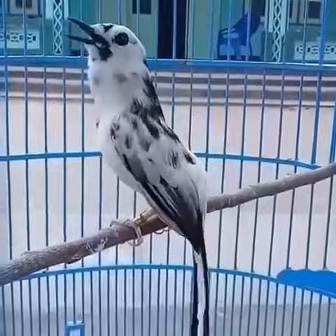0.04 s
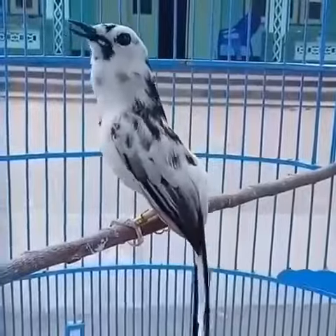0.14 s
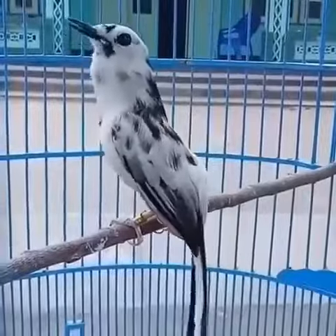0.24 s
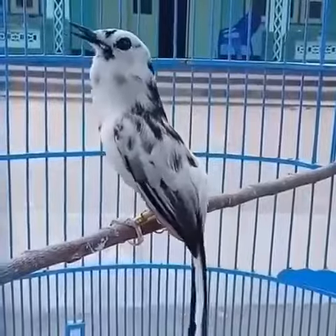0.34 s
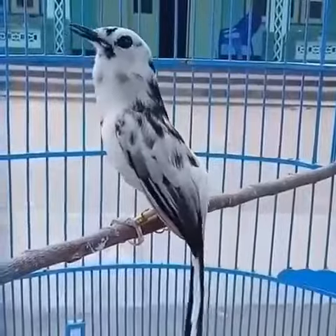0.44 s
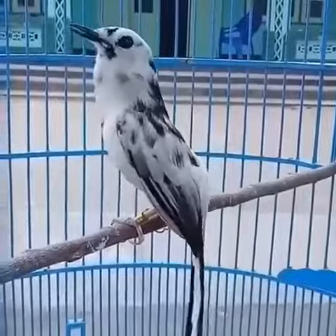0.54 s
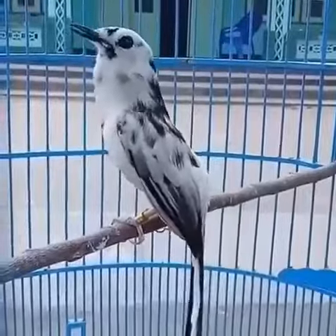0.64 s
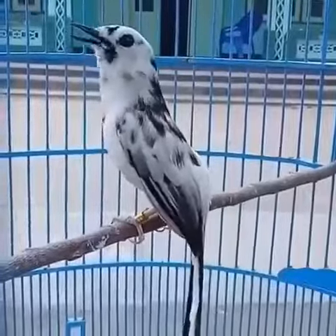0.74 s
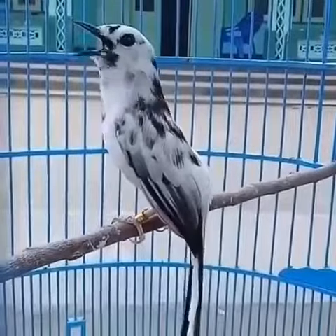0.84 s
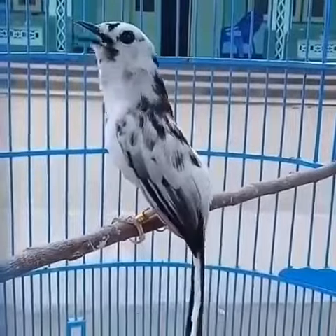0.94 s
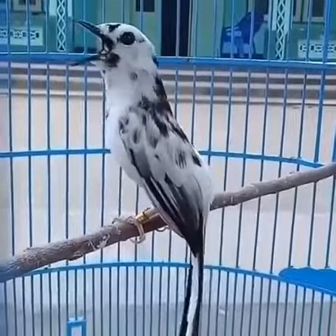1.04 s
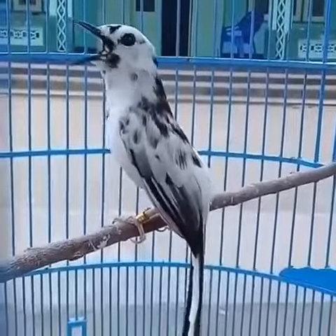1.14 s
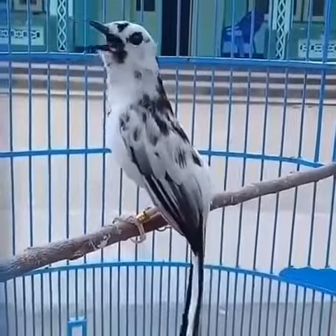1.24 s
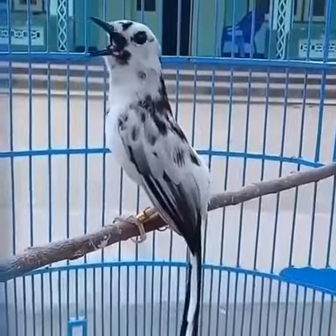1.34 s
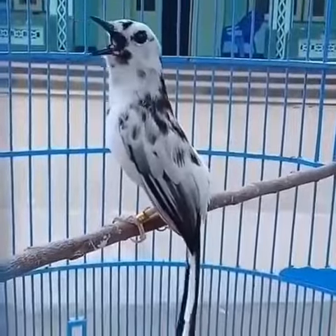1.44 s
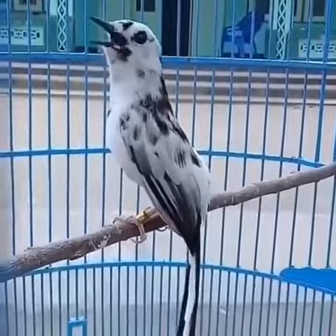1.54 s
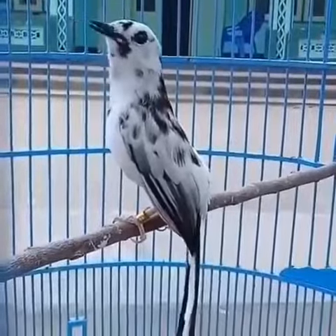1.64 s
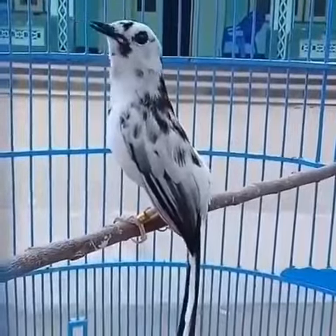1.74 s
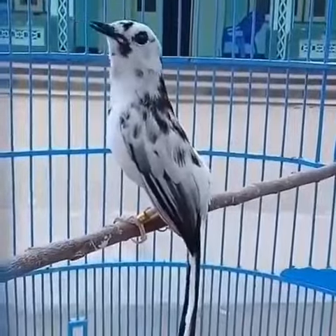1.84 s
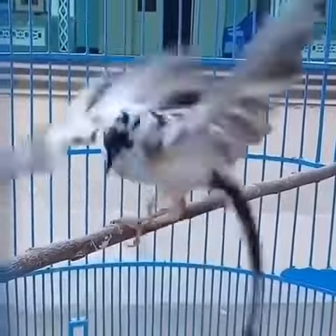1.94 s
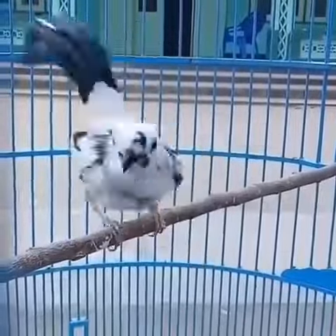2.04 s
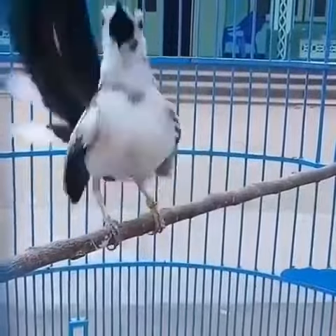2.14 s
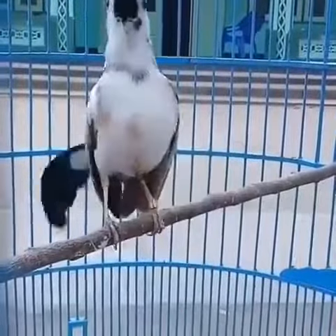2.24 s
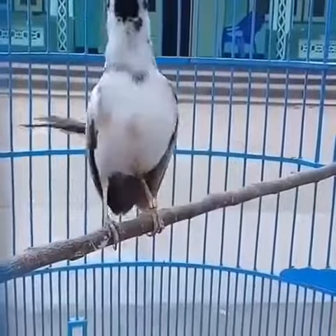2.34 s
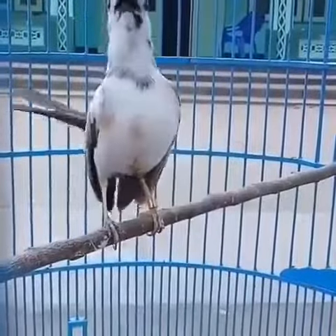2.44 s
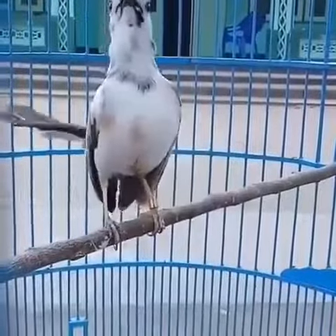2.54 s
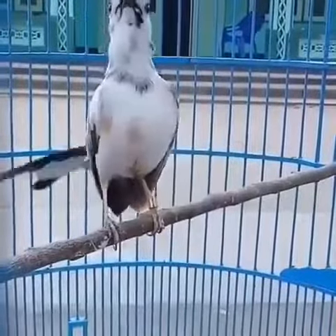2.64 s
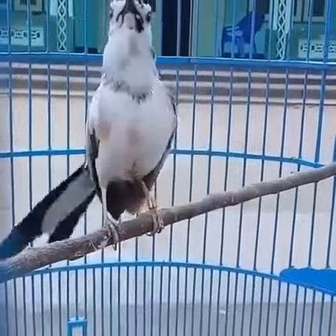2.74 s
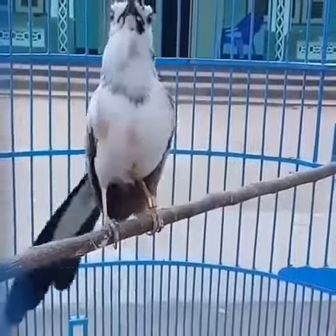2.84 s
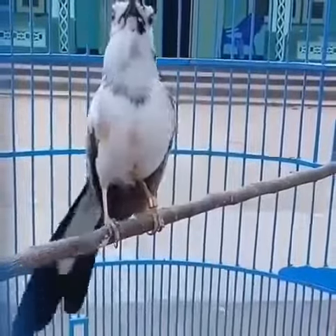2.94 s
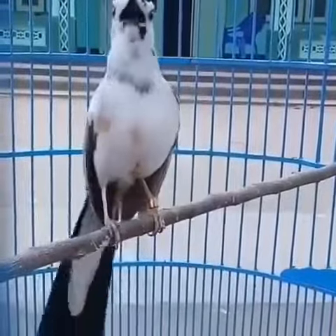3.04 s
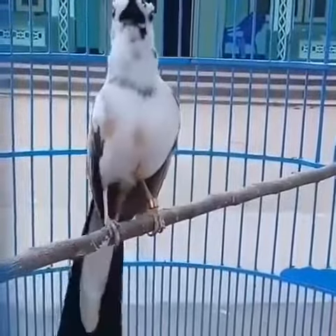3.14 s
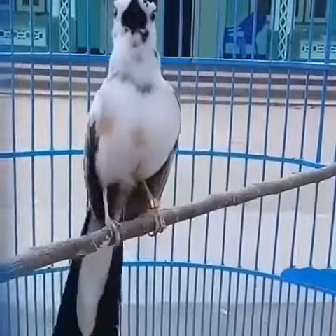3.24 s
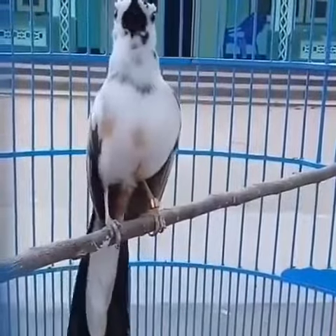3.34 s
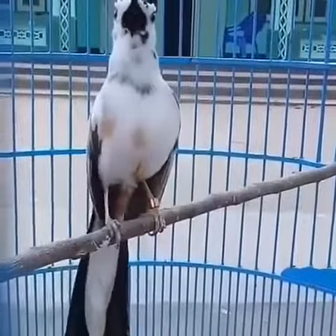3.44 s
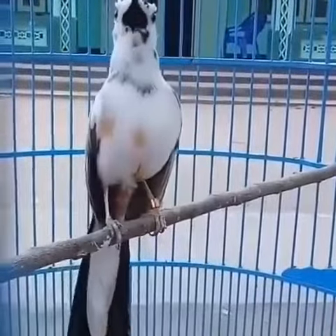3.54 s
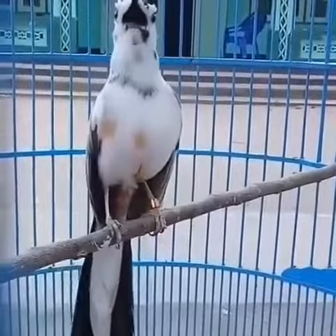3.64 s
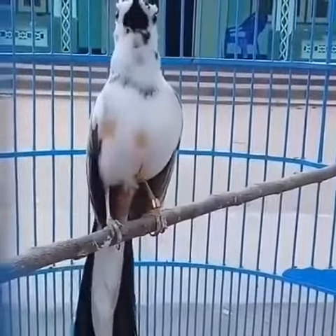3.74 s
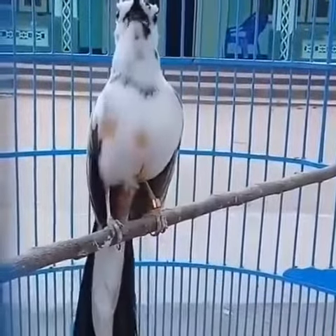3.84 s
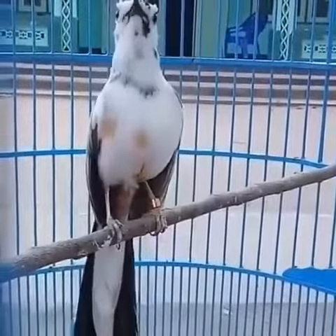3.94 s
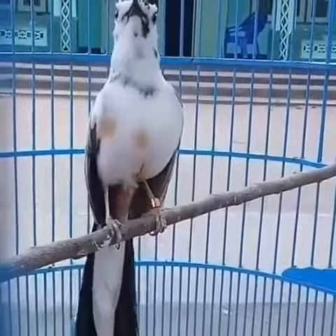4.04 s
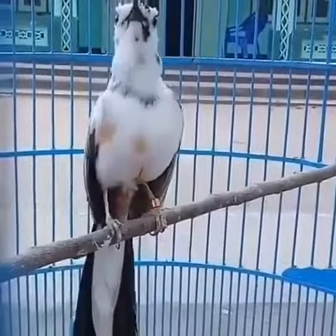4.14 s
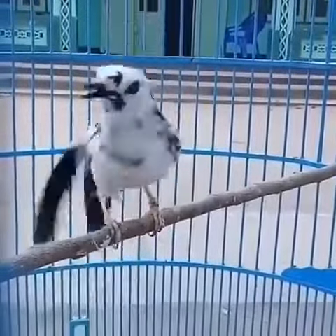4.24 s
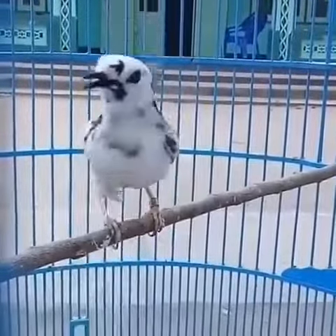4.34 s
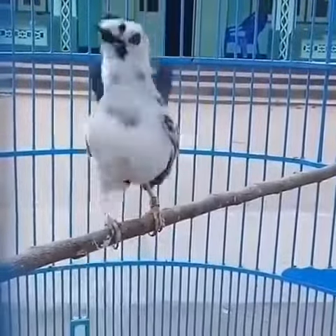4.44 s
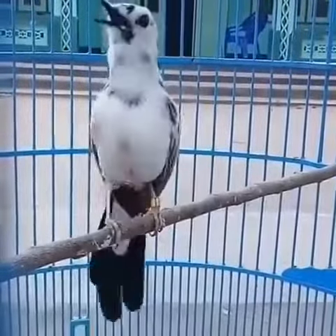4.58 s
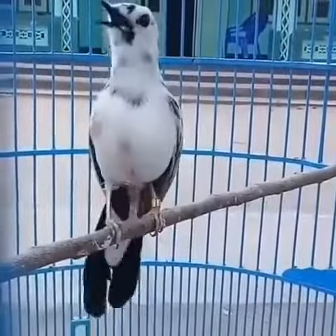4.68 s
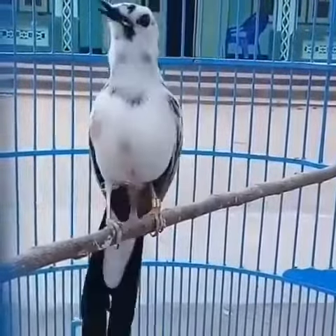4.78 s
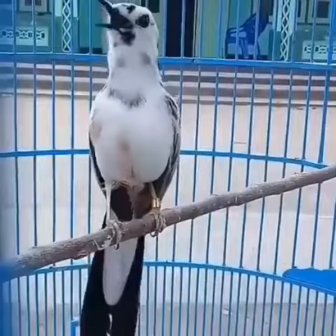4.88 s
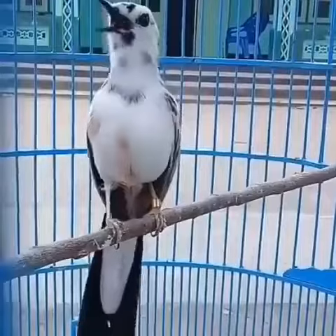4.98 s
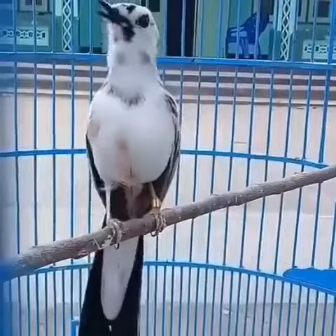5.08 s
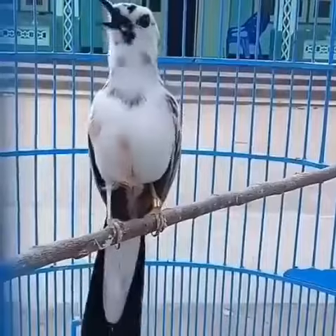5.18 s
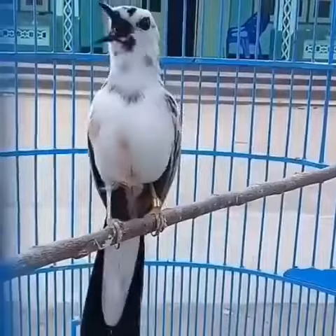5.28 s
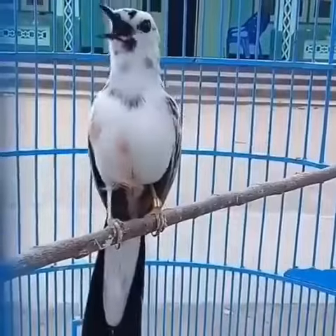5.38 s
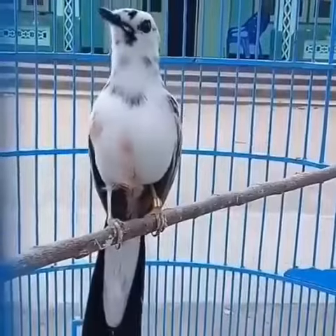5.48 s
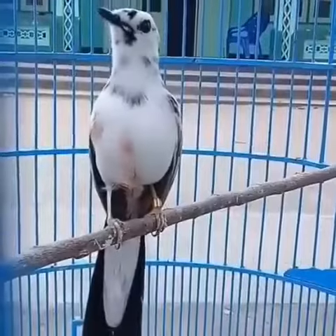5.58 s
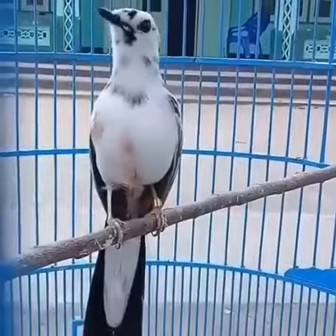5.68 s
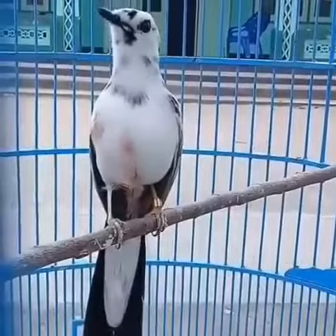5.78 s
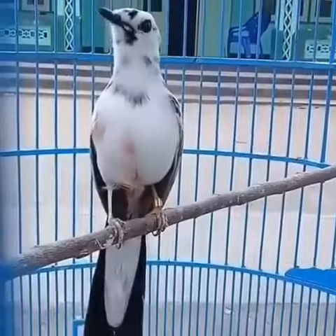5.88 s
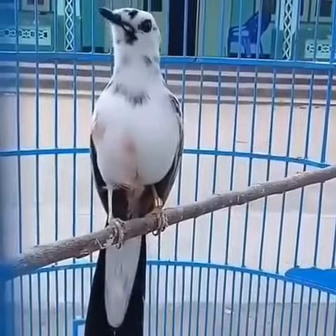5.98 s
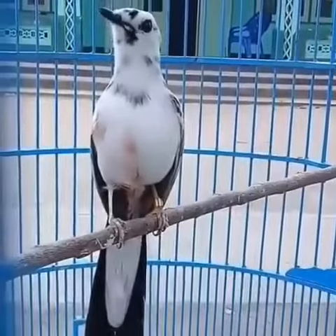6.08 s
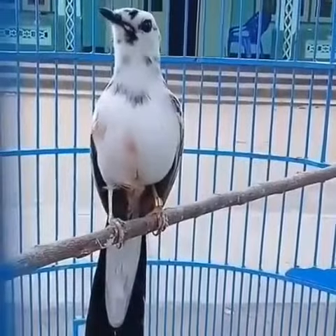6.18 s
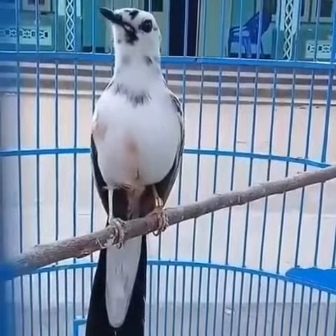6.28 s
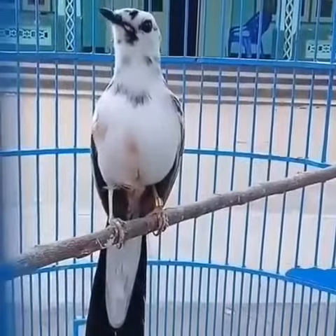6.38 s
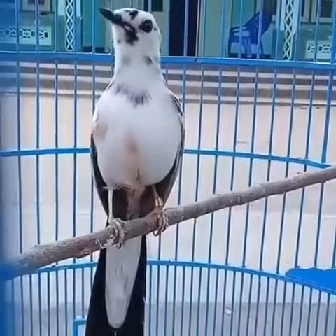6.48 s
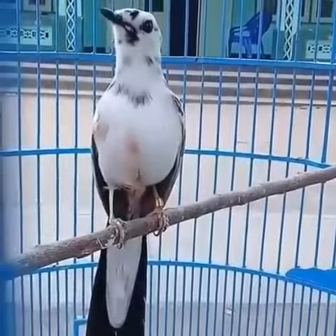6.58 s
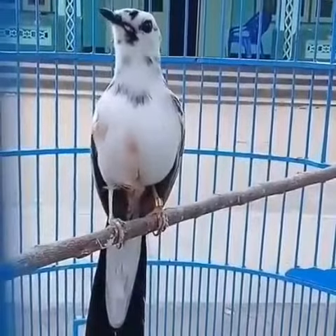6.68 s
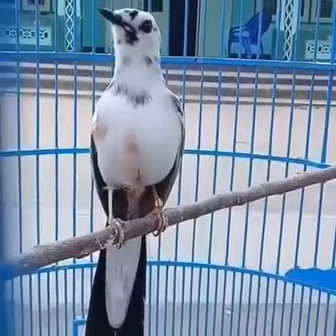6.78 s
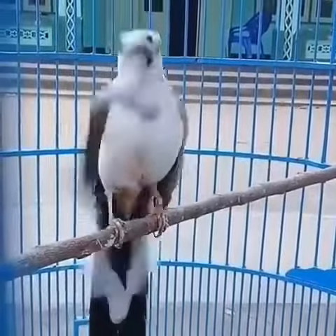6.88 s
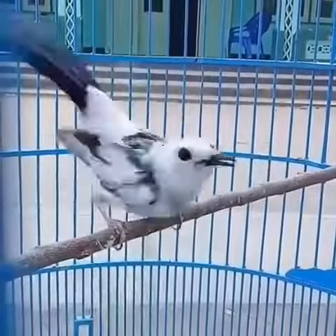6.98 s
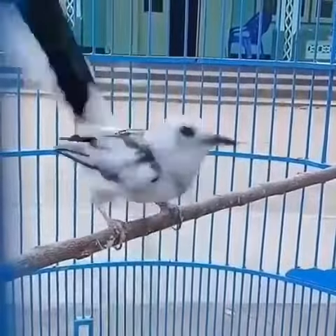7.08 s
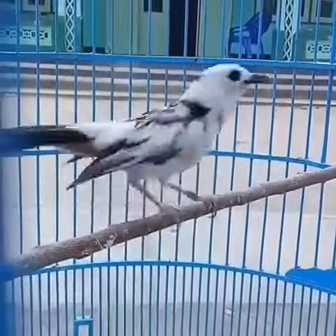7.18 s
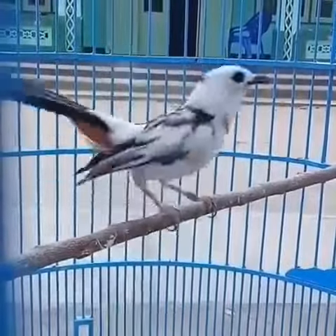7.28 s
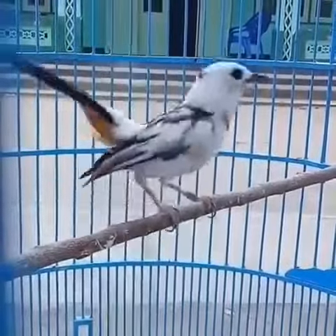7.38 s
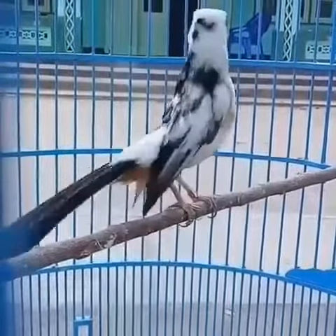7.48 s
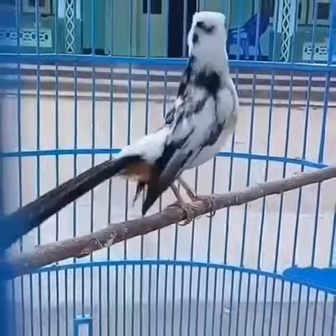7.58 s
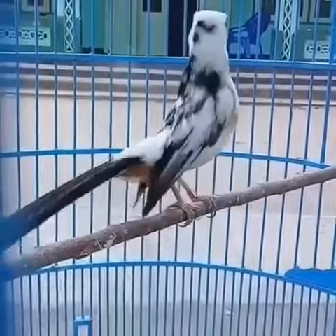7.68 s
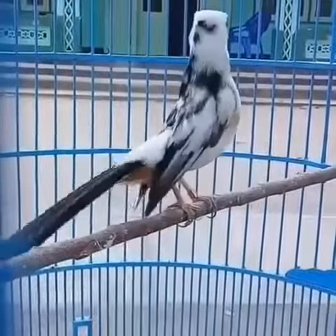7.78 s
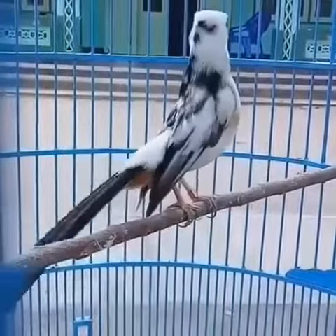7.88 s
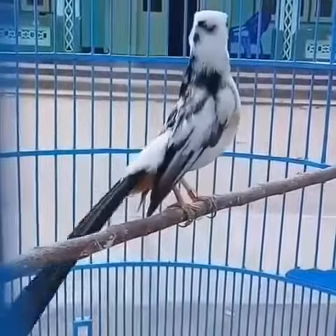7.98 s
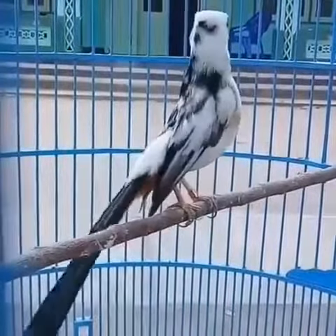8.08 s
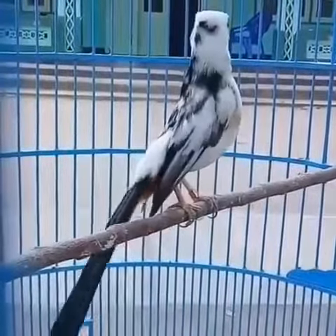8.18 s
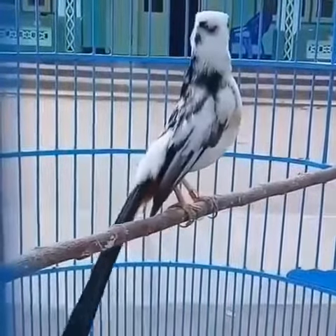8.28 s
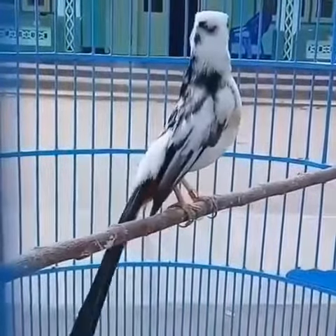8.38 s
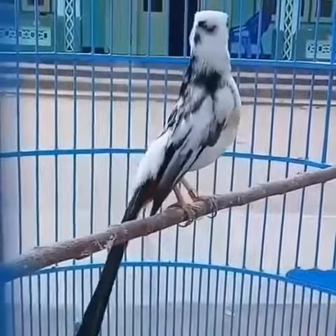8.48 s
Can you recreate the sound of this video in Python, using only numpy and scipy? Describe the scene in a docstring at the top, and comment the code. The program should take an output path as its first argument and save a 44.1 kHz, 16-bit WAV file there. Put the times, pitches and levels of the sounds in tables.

```python
"""Paved yard, close to a phone microphone: a caged songbird whistles, warbles, rasps and croaks low.
Its whistles are near-sine tones with flickering overtones; rasps and croaks are clicks through throat resonances.
Other birds whistle further off and a dove coos, as wavering tones; chatter and feather rustles are filtered clicks.
A faint town rumble of shaped noise lies behind, and a decaying noise tail makes the yard ring after each note."""
import sys
import numpy as np
from scipy import signal
from scipy.fft import rfft, irfft
from scipy.io import wavfile
from scipy.ndimage import uniform_filter1d

SR = 44100
rng = np.random.default_rng(int(sys.argv[2]) if len(sys.argv) > 2 else 0)


def materialize(psi):
    """Save the field psi as 16-bit PCM at rate SR to the path in sys.argv[1].

    A 1-D psi becomes a single channel; in a 2-D psi each row is a channel.
    """
    bounded = np.clip(np.atleast_2d(psi).T, -1, 1)
    quanta = np.round(bounded * 32767).astype(np.int16)
    wavfile.write(sys.argv[1], SR, quanta)


N = 375732
TIME = np.arange(N) / SR

# Distant town, spectrum before overall scaling: pitch_hz, level_db
TOWN = [(15, -42), (28, -13), (110, 0), (390, -17), (1100, -27), (2500, -15), (4500, -29), (13000, -46)]
TOWN_DB = -57
TOWN_SWELL_S, TOWN_SWELL_DB = [0, 2.1, 3.8, 5.7, 8.5], [-3.5, 0.5, -2.0, 0.63, -2.4]

# Distant dove, heard mostly by the upper octave: start_s, upper_octave_hz, level_db
COOS = [(4.052, 953, -51), (4.188, 942, -52.5), (4.559, 930, -47), (5.558, 720, -43), (5.691, 902, -42.5),
        (5.822, 1025, -40.5), (6.133, 917, -44.5), (6.341, 946, -48.5), (6.532, 922, -50.5),
        (6.791, 648, -44), (6.888, 656, -48.5)]
COO_S, COO_LOW_DB = 0.076, -18.5  # length; lower octave against the upper

# Scratchy bird chatter and soft feather rustles, short bursts and one long hiss of filtered clicks:
# start_s, length_s, centre_hz, filter_width_hz, level_db
CHATTER_AND_RUSTLES = [(.75, 0.22, 3800, 500, -41.5), (.48, .2, 4200, 1500, -47),
                       (.001, 0.035, 3500, 1100, -41), (5.825, 0.12, 5300, 2600, -50),
                       (6.192, 0.03, 4500, 1300, -43), (7.2, 0.49, 3040, 3000, -52.5),
                       (6.876, 0.042, 5500, 800, -44.5)]
# Far whistle shapes: length_share, share_of_way_from_first_to_second_pitch, level_db
FADING = [(0, 0.063, -2), (.3, 0.82, 0.5), (1, 0.97, -16.5)]
SWELLING = [(0, 0.017, -16.5), (.5, .5, -6), (1, 1, 1)]
HOOK = [(0, .35, -14.5), (.15, 0.96, -4), (.3, .6, 1), (.45, .12, 1.5), (1, 0.17, -13.5)]
CASCADE = [(0, .4, -15), (.1, 1, -4), (.26, .62, -2), (.38, .45, 0.5), (.52, .04, 0), (1, 0.02, -13.5)]
HUMP = [(0, 0.12, -8), (.55, 1, 1.5), (1, 0.13, -12)]
# When each is heard: start_s, length_s, first_pitch_hz, second_pitch_hz, level_db (added to the shape)
FADINGS = [(0.217, .177, 2630, 2255, -38), (0.515, 0.092, 4090, 3860, -39.5),
           (0.596, 0.083, 3680, 3694, -32), (1.887, 0.28, 2640, 2380, -50.5),
           (2.979, 0.15, 3214, 3125, -50), (6.003, 0.065, 6000, 3696, -32), (6.055, .1, 3910, 2740, -42.5),
           (6.667, 0.161, 1726, 1826, -31), (6.823, 0.4, 3000, 3305, -51.5),
           (8.039, 0.21, 2276, 2290, -47.5), (8.259, 0.28, 2580, 3193, -50.5)]
SWELLINGS = [(0.121, 0.052, 2110, 4600, -41.5), (.45, 0.072, 3700, 2864, -30.5),
             (2.22, 0.12, 3233, 3560, -44.5), (3.17, 0.12, 2542, 2508, -42.5),
             (5.915, .016, 2700, 5200, -32)]
HOOKS = [(.158, .04, 3380, 4560, -33), (5.924, 0.039, 3910, 4610, -35.5), (6.361, 0.18, 1721, 1898, -33.5)]
CASCADES = [(7.27, .17, 2199, 2550, -21), (7.534, 0.2, 2206, 2850, -25)]
HUMPS = [(.86, .09, 2330, 3143, -31.5), (6.659, 0.54, 2550, 2984, -46), (6.85, .19, 1400, 1784, -38),
         (7.045, 0.27, 1294, 2066, -33.5)]
# Far whistles in pairs: shape, events
FAR_CALLS = [(FADING, FADINGS), (SWELLING, SWELLINGS), (HOOK, HOOKS), (HUMP, HUMPS), (CASCADE, CASCADES)]
FAR_OCTAVE_DB = -34.5  # second harmonic of the far whistles

# Harsh close bursts: start_s, relative_level_db, throat_hz, length_ms
CHACKS = [(2.358, -3, 3900, 9.7), (2.457, -1, 4660, 10.4), (2.467, -2.5, 4417, 5.7),
          (2.554, -3, 4180, 18.6), (2.615, -1.5, 3880, 13), (2.681, -7.5, 3480, 8.7)]
# Short dry tacks with a hollow low knock: start_s, relative_level_db, throat_hz, length_ms
TACKS = [(2.1608, -14, 4030, 8.4), (2.174, -10.5, 3920, 7.5), (2.1839, -17, 4080, 6.2),
         (2.1954, -24, 3780, 16.5), (2.2094, -35, 3215, 5.5), (7.1546, -5.5, 3800, 8.1),
         (7.1664, -12, 3400, 8.5), (7.3564, -13.5, 4170, 8.9), (7.3675, -19, 3375, 7.3)]
# Resonance of that knock: pitch_hz, filter_width_hz, level_db
TACK_KNOCK = (860, 424, -9.5)
CHACK_RISE, TACK_RISE = 0.48, .15  # attack as a share of the length
BURST_TRIM_DB = -9.5  # added to the levels of chacks and tacks
# Drawn-out rasp between the bursts: time_s, level_db
RASP = [(2.345, -43), (2.358, -19), (2.44, -26.5), (2.53, -24), (2.59, -35.5), (2.614, -51.5)]
# Throat resonances of the rasp: pitch_hz, half_filter_width_hz, relative_level_db
RASP_THROAT = [(1374, 110, 9.5), (2106, 410, 13.5), (4030, 830, 8.5), (9900, 7400, -44)]

# Low croaks after falling notes, one list of points each: time_s, pulse_rate_hz, level_db
CROAKS = [
    [(.648, 476, -59.5), (.66, 506, -36), (.75, 455.5, -36), (.87, 406, -41), (.89, 404, -58.5)],
    [(3.005, 507.4, -36.5), (3.02, 489.7, -32), (3.085, 419.5, -42), (3.097, 399, -58)],
]
# Throat resonances of the croak: pitch_hz, filter_width_hz, relative_level_db
CROAK_THROAT = [(1070, 900, 6), (1530, 490, -12)]

# Close singer's syllable shapes: length_share, share_of_way_from_low_to_high_pitch, level_db
DROP = [(0, .42, -29.5), (.25, .67, -8.5), (.62, 0.98, 1), (.76, .6, -6), (1, 0, -23)]
SAG = [(0, 1, -4.5), (.15, .96, 0), (.5, 0.94, -5), (.7, .5, -11), (1, 0, -31.5)]
FLICK = [(0, 0, -31.5), (.5, 0.29, -1), (1, 1, -6)]
TUMBLE = [(0, 1, -23), (.12, .92, -4.5), (.28, .62, -9.5), (.38, .35, -.5), (.52, .36, -5.5),
          (.65, .12, -3.5), (.84, .18, -7.5), (.92, .08, 1), (1, 0, -25)]
TRILL = [(0, 0, -32), (.06, .92, -2.5), (.2, .98, -4.5), (.4, .85, -3.5), (.72, .8, -6.5), (.9, .81, -6.5),
         (1, .84, -26)]
SCOOP = [(0, .38, -24), (.11, .11, -18), (.26, 0.027, -18.5), (.38, .12, -16.5), (.56, .68, -3),
         (.78, .93, -0.5), (.91, 0.98, -7), (1, 0.93, -15)]
STEP = [(0, .06, -42.5), (.17, .05, -16), (.4, 0.017, -14), (.56, .9, -0.5), (.72, 1, 2.5), (.92, .9, 0),
        (1, .86, -13.5)]
ARCH = [(0, .3, -26.5), (.15, .65, -1.5), (.45, 1, 0), (.8, .5, 1), (.93, .1, -3.5), (1, 0, -25)]
# The other half of the syrinx joins above a drop; same columns
DUET = [(0, 0.096, -17), (.5, .45, -6.5), (.9, .75, -0.5), (1, 0.98, -19.5)]
# When each is sung: start_s, length_s, low_hz, high_hz, level_db (added to the shape)
DROPS = [(0.014, 0.073, 813, 1780, -1), (0.399, 0.079, 875, 1795, -0.5)]
SAGS = [(.486, .108, 553, 870, -18), (2.902, 0.1, 507, 925, -13.5)]
FLICKS = [(1.012, .024, 2130, 5500, -10.5), (3.278, 0.027, 2142, 5370, -7)]
TUMBLES = [(1.036, .121, 1679, 3320, -.4), (3.302, .121, 1732, 3220, -0.9)]
TRILLS = [(1.2, .211, 1823, 3515, -1.2), (3.469, .223, 1898, 3496, -.4)]
SCOOPS = [(1.478, .102, 1239, 3497, -7), (1.642, .108, 1280, 3630, -8), (3.76, 0.099, 1391, 3531, -3.5),
          (3.92, 0.12, 1409, 3370, -8.5)]
STEPS = [(5.016, 0.13, 1019, 1932, -1.2), (5.33, 0.12, 1084, 1937, -1.6)]
ARCHES = [(4.91, .064, 2250, 2477, -0.94), (5.2, 0.087, 2347, 2619, -1.4)]
DUETS = [(2.8, .058, 1356, 1875, -10.5)]
# Throat tuned per syllable: shape, events, throat_hz, overtone_base_db (at or above that pitch)
SYLLABLES = [(DROP, DROPS, 1730, -45.5), (SAG, SAGS, 1725, -44.5), (FLICK, FLICKS, 3000, -26.5),
             (TUMBLE, TUMBLES, 1700, -33), (TRILL, TRILLS, 2200, -34.5), (SCOOP, SCOOPS, 3250, -34.5),
             (STEP, STEPS, 900, -44.5), (ARCH, ARCHES, 2400, -40), (DUET, DUETS, 1600, -36)]
# Notes sung only once, one list of points each: time_s, pitch_hz, level_db
SOLOS = [
    [(.091, 859, -20.5), (.109, 859, -25.5), (.135, 1236, -5), (.154, 1463, -5.5), (.17, 1572, 0),
     (.186, 1642, -1.5), (.202, 1525, -23.5)],
    [(.235, 995, -32), (.259, 1010, -13), (.275, 1474, -10), (.307, 1753, -0.5), (.329, 1633, -4),
     (.337, 1714, -32)],
    [(2.746, 1324, -38.5), (2.752, 1376, -22), (2.766, 1395, -19), (2.772, 1300, -44)],
    [(2.8, 1156, -40), (2.828, 1142, -26.5), (2.864, 1413, -2), (2.88, 1170, -5.5), (2.897, 960, -17.5)],
    [(4.35, 1601, -44), (4.405, 1628, -2.5), (4.434, 1514, -14), (4.452, 1437, -3.5), (4.458, 1564, -32.5),
     (4.48, 1462, -29.5), (4.49, 1544, -4.5), (4.504, 1507, -29), (4.544, 1486, -22.5)],
    [(4.6, 1686, -43.5), (4.626, 1655, -2.5), (4.668, 1577, -1.5), (4.692, 1289, -6.5),
     (4.714, 1459, -13.5), (4.718, 1555, -4), (4.75, 1675, -3), (4.798, 1614, -3.5), (4.83, 1853, -1),
     (4.854, 1732, -2), (4.862, 1690, -22.5)],
    [(5.48, 2675, -23), (5.506, 2773, -3), (5.535, 2852, -6), (5.552, 2720, 0), (5.59, 2542, -6.5),
     (5.602, 2225, -11.5), (5.612, 2400, -45)],
]
# Throat of each of those notes in turn: throat_hz, overtone_base_db
SOLO_THROATS = [(1660, -44), (1573, -43.5), (2300, -41), (1750, -42), (1600, -39), (1642, -42.5),
                (2810, -34.5)]
# Wobbles in falling tumbles, trills and held notes:
# start_s, end_s, rate_hz, pitch_swing_percent, level_swing_db
WARBLES = [(1.057, 1.155, 32.4, 3, 2.5), (1.212, 1.245, 70, 2, 2), (1.24, 1.42, 31.25, 2.6, 3.5),
           (3.32, 3.428, 28.4, 2.6, 4), (3.491, 3.523, 97, 3.5, 2), (3.507, 3.673, 31.5, 3, 2.5),
           (4.43, 4.523, 91.9, 6.2, 3), (4.668, 4.815, 125.2, 4, 3), (4.815, 4.86, 190, 6, 1.5)]
# Beak colour of the overtones: pitch_hz, level_db
BEAK = [(500, -4.5), (4500, -5.5), (7500, -12.5), (10000, 7), (14000, -5.5)]
REEDY_DB_PER_OCTAVE = 37  # overtones grow as the pitch sinks below the throat
JOIN_S, JOIN_RATIO = .008, 1.25  # notes this near in time and pitch are sung in one breath
OVERTONE_FALL_DB = 11.5  # per further harmonic
THIN_EDGE_DB = -57  # faint buzz added to every overtone before the beak colour
HOARSE = 0.0074  # random share of pitch, rms
OVERTONE_ROUGH = .25  # phase flicker per harmonic above the second, radians rms
SMEAR_OCTAVES_PER_S = 6  # a glide this fast doubles the flicker at twice SMEAR_FROM_HZ
SMEAR_FROM_HZ = 4500  # only overtones above this are smeared by glides
BREATH_DB = -70.5  # airstream hiss per octave a second of pitch glide

# Pitches that echoes from the cage floor and perch cancel: pitch_hz, filter_width_hz, share_removed
CANCELS = [(937, 31, 0.88), (1450, 110, 1), (2063.5, 250, 0.99), (2521, 200, 0.79), (3047, 170, 1),
           (3500, 61, 0.51), (4510, 50, 0.62)]
YARD_T60_S = 0.5
YARD_DB, FAR_WET_DB, DOVE_WET_DB = -21.5, -2.5, -4  # sends to the yard tail
SIDE_DB, TOP_HZ = -10, 13400  # left-right treble difference; upper cutoff


def amp(db):
    """Amplitude factor of a level in dB."""
    return 10 ** (np.asarray(db) / 20)


def unit(x):
    """Signal scaled to rms 1."""
    return x / np.sqrt(np.mean(x ** 2))


def wander(width):
    """Slow random curve, rms 1: noise averaged twice over a width in samples."""
    once = uniform_filter1d(rng.standard_normal(N), size=width)
    return unit(uniform_filter1d(once, size=width))


def ring(x, hz, width_hz):
    """Resonance with gain 1 at its centre."""
    return signal.lfilter(*signal.iirpeak(hz, hz / width_hz, fs=SR), x)


def double_ring(x, hz, width_hz):
    """Two equal resonances in series, for steeper skirts."""
    return ring(ring(x, hz, width_hz), hz, width_hz)


def colour(table, hz):
    """Gain of a spectrum table at given frequencies, with straight lines over log frequency."""
    at, db = np.transpose(table)
    return amp(np.interp(np.log(hz), np.log(at), db))


def fade(x, ms=2):
    """Soft edges on a note."""
    edge = np.arange(len(x)) / (ms * SR / 1000)
    return x * np.clip(edge, 0, 1) * np.clip(edge[::-1], 0, 1)


def read(rows, glide_ms=7):
    """The samples a note spans, its rounded pitch glide, its gain and any further columns."""
    s, hz, db, *columns = np.transpose(rows)
    span = slice(int(s[0] * SR), min(int(s[-1] * SR), N))
    t = TIME[span]
    pitch = uniform_filter1d(np.interp(t, s, hz), size=int(glide_ms * SR / 1000))
    # straight lines in the square root of amplitude
    gain = np.interp(t, s, amp(db / 2)) ** 2
    return span, pitch, gain, *(np.interp(t, s, c) for c in columns)


def sing(shape, events):
    """Point rows (time_s, pitch_hz, level_db) of a shape fitted to each event."""
    share, way, db = np.transpose(sorted(shape))
    return [np.transpose([s + share * length, a + way * (b - a), level + db])
            for s, length, a, b, level in events]


def pulses(hz, jitter, scatter_db):
    """Uneven clicks around a given rate, scattered in timing and strength."""
    stretch, size = rng.standard_normal((2, len(hz)))
    drift = uniform_filter1d(stretch, size=32) * np.sqrt(32)
    beat = np.floor(np.cumsum(hz * np.exp(jitter * drift)) / SR)
    clicks = np.diff(beat, prepend=0) > 0
    return clicks * amp(scatter_db * size)


def clatter():
    """Dense irregular clicks with a little noise, lows removed."""
    clicks = pulses(np.full(N, 1100.), .5, 4.) + .1 * rng.standard_normal(N)
    return signal.sosfilt(signal.butter(4, 500, "high", fs=SR, output="sos"), clicks)


def town():
    """Far rumble and hiss: noise shaped by a spectrum, swelling slowly."""
    bins = np.maximum(np.fft.rfftfreq(N, 1 / SR), 1)
    noise = irfft(rfft(rng.standard_normal(N)) * colour(TOWN, bins), N)
    swell_db = np.interp(TIME, TOWN_SWELL_S, TOWN_SWELL_DB)
    return amp(TOWN_DB + swell_db) * unit(noise)


def dove():
    """Soft distant coos: two tones an octave apart with wavering phase and a rounded swell."""
    out, t = np.zeros(N), np.arange(int(COO_S * SR)) / SR
    waver = 1.2 * wander(600)
    for s, hz, db in COOS:
        start = int(s * SR)
        span = slice(start, start + len(t))
        phase = 2 * np.pi * hz * t + waver[span]
        voice = np.sin(phase) + amp(COO_LOW_DB) * np.sin(phase / 2)
        out[span] += amp(db) * voice * np.sin(np.pi * t / COO_S) ** 2
    return out


def neighbours():
    """Thin wavering sines for far whistles; filtered clicks for chatter and soft feather rustles."""
    out, clicks = np.zeros(N), clatter()
    waver = 1 + .02 * wander(300)
    throb = amp(3 * wander(200))  # moving air makes far whistles throb
    for shape, when in FAR_CALLS:
        for note in sing(shape, when):
            span, hz, gain = read(note)
            phase = 2 * np.pi * np.cumsum(hz * waver[span]) / SR
            voice = np.sin(phase) + amp(FAR_OCTAVE_DB) * np.sin(2 * phase)
            out[span] += fade(gain * voice * throb[span], ms=4.9)
    for s, length, hz, width_hz, db in CHATTER_AND_RUSTLES:
        span = slice(int(s * SR), int((s + length) * SR))
        scratch = unit(double_ring(clicks[span], hz, width_hz))
        decay = 1 - (TIME[span] - s) / length
        out[span] += fade(amp(db) * scratch * decay * throb[span] ** 1.5, ms=14)
    return out


def croaks():
    """Low rough pulses through a half-closed throat."""
    out = np.zeros(N)
    for note in CROAKS:
        span, hz, gain = read(note)
        clicks = pulses(hz, .15, 3.) + .05 * rng.standard_normal(len(hz))
        clicks = signal.sosfilt(signal.butter(4, 2000, fs=SR, output="sos"), clicks)
        voice = sum(amp(db) * double_ring(clicks, f, width) for f, width, db in CROAK_THROAT)
        out[span] += fade(gain * unit(voice))
    return out


def rasps():
    """The syrinx in chaos: clicks through a wide throat, in bursts, tacks and one drawn-out rasp."""
    clicks = clatter()
    body = unit(sum(amp(db) * double_ring(clicks, hz, 2 * half) for hz, half, db in RASP_THROAT))
    knock_hz, width_hz, knock_db = TACK_KNOCK
    hollow = body + amp(knock_db) * unit(double_ring(clicks, knock_hz, width_hz))
    s, db = np.transpose(RASP)
    out = amp(np.interp(TIME, s, db)) * (TIME > s[0]) * (TIME < s[-1]) * body
    for events, throat, rise in (CHACKS, body, CHACK_RISE), (TACKS, hollow, TACK_RISE):
        for s, db, hz, ms in events:
            i = int(s * SR)
            # time in lengths; the fading end runs on to twice the length
            t = np.arange(int(2 * ms * SR / 1000)) / (ms * SR / 1000)
            span = slice(i, i + len(t))
            burst = unit(.5 * throat[span] + 6 * double_ring(clicks[span], hz, 860))
            envelope = np.clip(t / rise, 0, 1) * np.exp(-t ** 3)
            out[span] += amp(db + BURST_TRIM_DB) * burst * envelope
    return out


def song():
    """Close notes as rows (time_s, pitch_hz, level_db, overtone_base_db); notes that meet are joined."""
    parts = [(note, throat_hz, pure_db) for shape, when, throat_hz, pure_db in SYLLABLES
             for note in sing(shape, when)]
    parts += [(np.array(note), *throat) for note, throat in zip(SOLOS, SOLO_THROATS)]
    notes = []
    for rows, throat_hz, pure_db in sorted(parts, key=lambda part: part[0][0, 0]):
        octaves_below = np.maximum(np.log2(throat_hz / rows[:, 1]), 0)
        rows = np.column_stack([rows, pure_db + REEDY_DB_PER_OCTAVE * octaves_below])
        for k, last in enumerate(notes):
            near_time = abs(rows[0, 0] - last[-1, 0]) < JOIN_S
            near_pitch = abs(np.log(rows[0, 1] / last[-1, 1])) < np.log(JOIN_RATIO)
            if near_time and near_pitch:
                rows = np.array(sorted(map(tuple, np.vstack([notes.pop(k), rows]))))
                break
        notes.append(rows)
    return notes


def whistles():
    """Near-sine voice with thin flickering overtones; warbles swing pitch and level together."""
    swing, swell = np.zeros(N), np.zeros(N)
    for start, end, rate_hz, percent, swell_db in WARBLES:
        edges = np.clip(np.minimum(TIME - start, end - TIME) / .005, 0, 1)
        wave = np.sin(2 * np.pi * rate_hz * (TIME - start)) * edges
        swing += percent / 100 * wave
        swell += swell_db * wave
    swing += HOARSE * unit(uniform_filter1d(rng.standard_normal(N), size=60))
    flicker = OVERTONE_ROUGH * wander(50)
    breath = unit(double_ring(rng.standard_normal(N), 2400, 4000))
    out = np.zeros(N)
    for note in song():
        span, hz, gain, overtone_db = read(note)
        phase = 2 * np.pi * np.cumsum(hz * (1 + swing[span])) / SR
        glide = np.abs(np.gradient(np.log2(hz))) * SR  # octaves per second
        smear = np.minimum(uniform_filter1d(glide, size=900) / SMEAR_OCTAVES_PER_S, 3)
        voice = np.sin(phase) + amp(BREATH_DB) * glide * breath[span]
        for k in range(2, 12):
            thinned = amp(overtone_db - OVERTONE_FALL_DB * (k - 2.5)) + amp(THIN_EDGE_DB)
            size = thinned * colour(BEAK, k * hz)
            # higher harmonics and fast glides wander more in phase and smear into grain
            grain = 1 + smear * np.clip(k * hz / SMEAR_FROM_HZ - 1, 0, 1)
            overtone = np.sin(k * phase + (k - 2) * flicker[span] * grain)
            voice = voice + size * overtone * (k * hz < TOP_HZ)
        out[span] += fade(gain * amp(swell[span]) * voice)
    return out


def echo(x, t60_s, seconds=0.91):
    """A tail of dense reflections, duller as it dies; power gain 1."""
    t = np.arange(int(seconds * SR)) / SR
    tail = rng.standard_normal(len(t))
    dull = signal.lfilter([.3], [1, -.7], tail)
    tail = dull + (tail - dull) * np.exp(-t / 0.18)
    tail = tail * np.exp(-np.log(1000) * t / t60_s) * (t > .006)  # reflections begin after 6 ms
    return signal.fftconvolve(x, tail / np.sqrt(np.sum(tail ** 2)))[:N]


def scene():
    """The close singer with cage cancellations, the distant birds, the yard tail and the town."""
    background, coos, far = town(), dove(), neighbours()
    bird = croaks() + rasps() + whistles()
    near = bird
    for hz, width_hz, share in CANCELS:
        near = near - share * ring(near, hz, width_hz)
    sent = amp(YARD_DB) * bird + amp(FAR_WET_DB) * far + amp(DOVE_WET_DB) * coos
    mid = background + coos + far + near + echo(sent, YARD_T60_S)
    return np.array([mid, mid])


def record(dry):
    """Loudest peaks are rounded, treble wanders oppositely left and right, and the top is cut."""
    mid = dry[0] / (1 + (dry[0] / .93) ** 14) ** (1 / 14)
    treble = signal.sosfilt(signal.butter(8, 4300, "high", fs=SR, output="sos"), mid)
    side = amp(SIDE_DB) * wander(200) * treble
    top_cut = signal.ellip(8, .2, 70, TOP_HZ, fs=SR, output="sos")
    return signal.sosfilt(top_cut, [mid + side, mid - side])


dry = scene()
out = record(dry)
materialize(out)
```